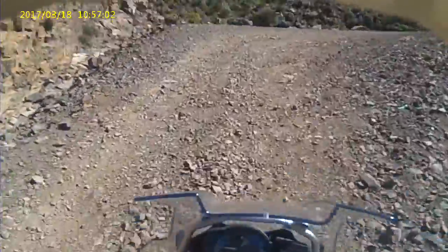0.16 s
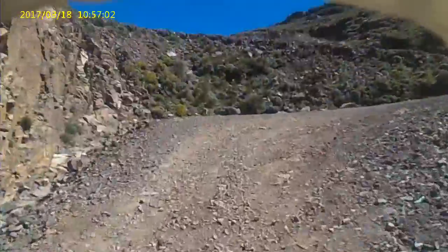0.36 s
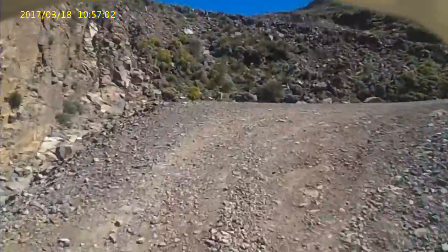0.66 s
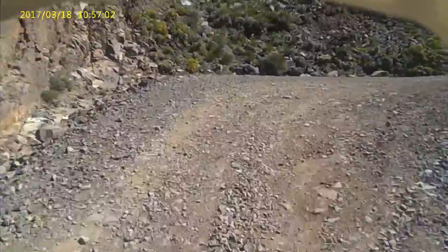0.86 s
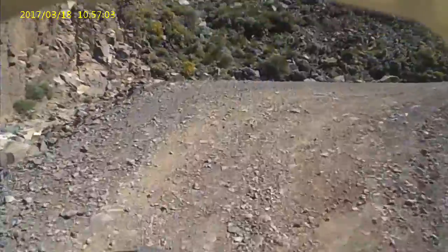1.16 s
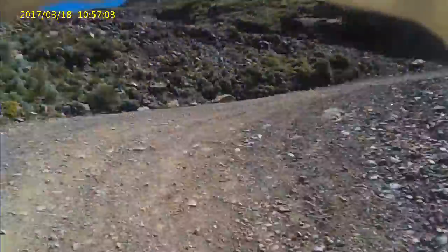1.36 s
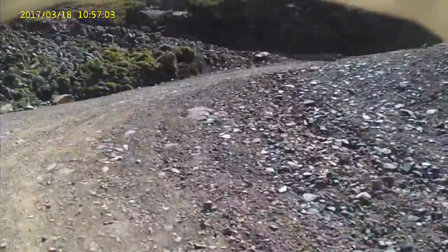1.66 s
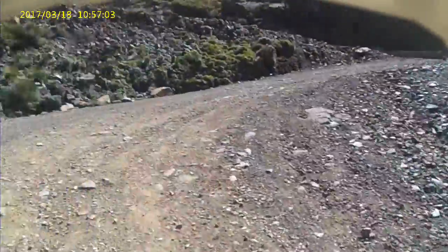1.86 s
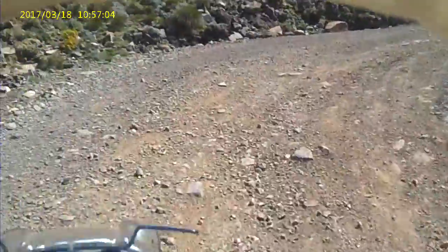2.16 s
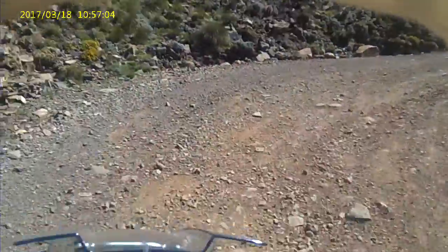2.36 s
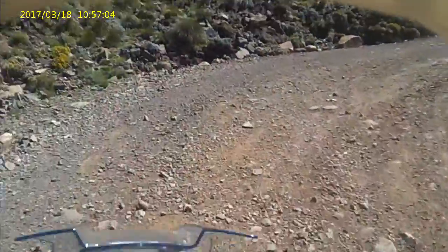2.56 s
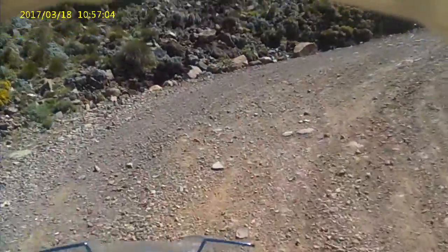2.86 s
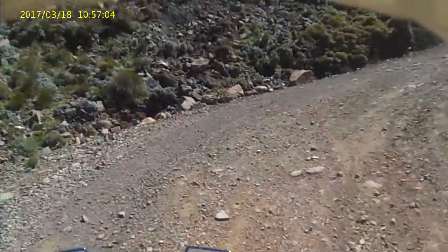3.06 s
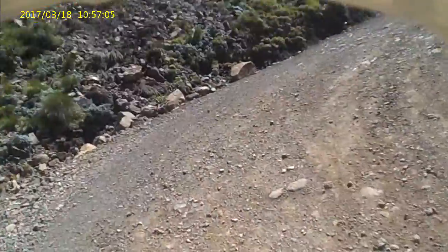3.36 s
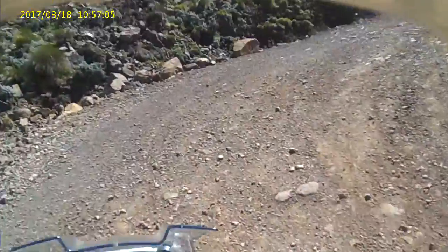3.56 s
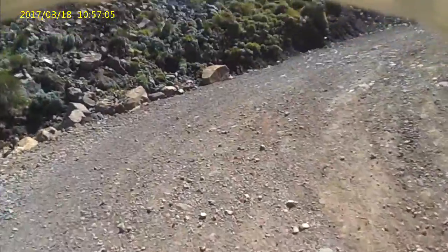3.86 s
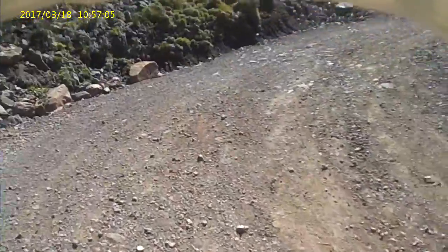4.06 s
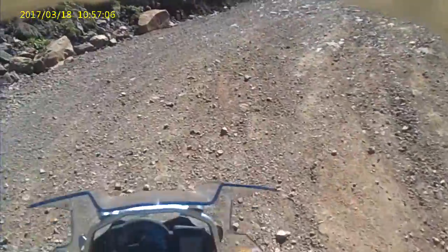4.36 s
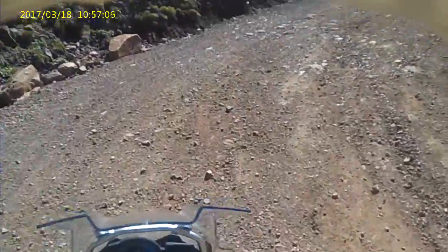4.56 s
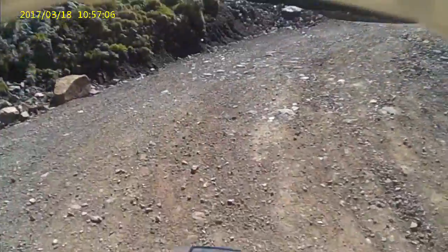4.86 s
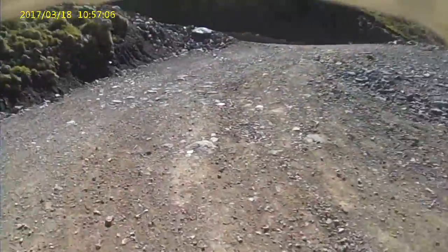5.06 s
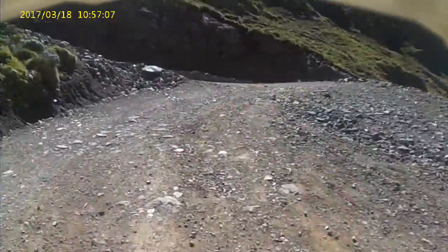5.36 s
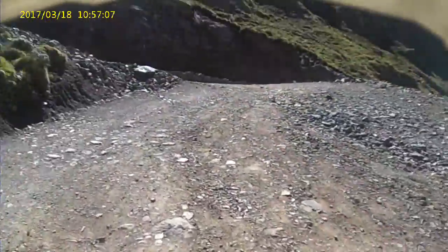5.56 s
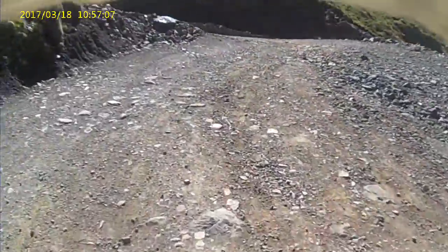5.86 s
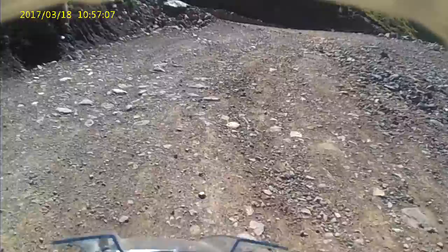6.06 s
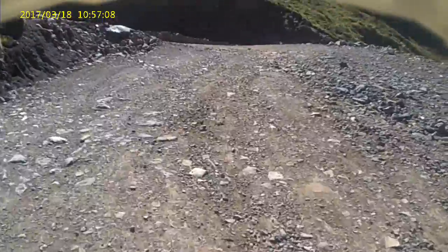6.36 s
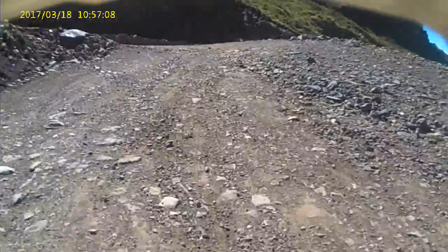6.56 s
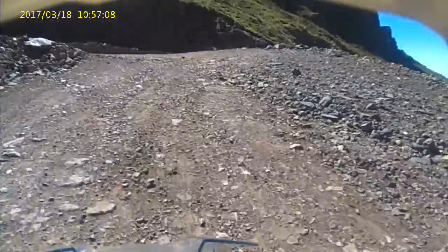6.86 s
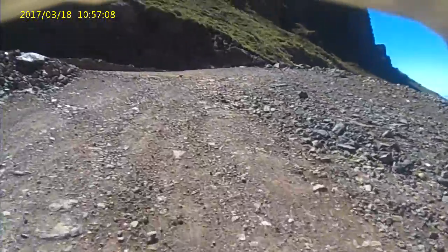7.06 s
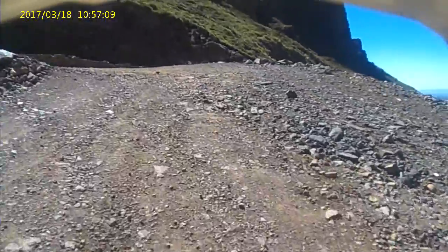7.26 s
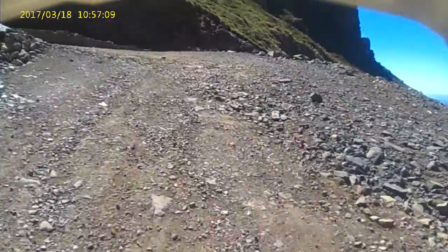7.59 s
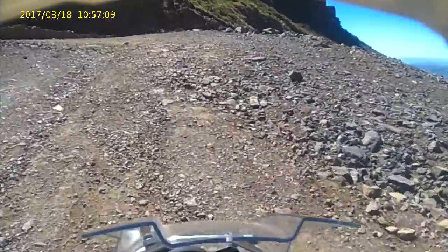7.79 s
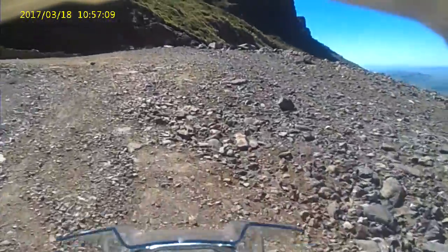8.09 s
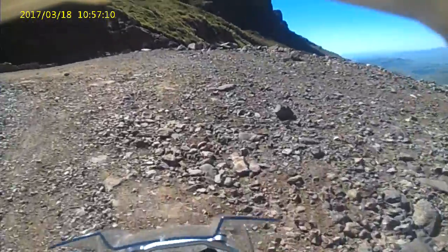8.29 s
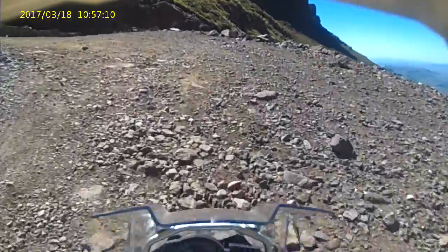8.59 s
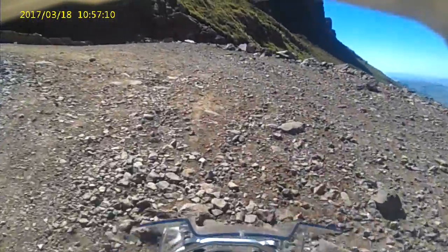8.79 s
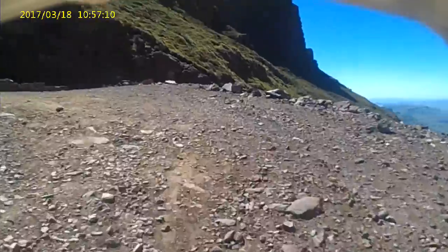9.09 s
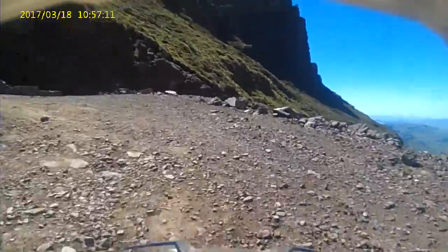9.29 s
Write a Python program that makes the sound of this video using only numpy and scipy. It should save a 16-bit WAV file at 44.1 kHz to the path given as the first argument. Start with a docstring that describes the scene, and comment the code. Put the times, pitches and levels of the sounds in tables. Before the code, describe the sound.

Boxy, muffled motorbike engine clatters and throbs uphill in uneven throttle bursts, with gravel crackle, sharp stone knocks and brief rattles.

```python
"""Loose gravel track: a single-cylinder motorcycle climbs, heard inside a camera case on the rider.
Exhaust: filtered pulse per firing plus gas noise, dropping as the throttle shuts; valve gear clatters on.
Tyres: clumped random cracks; single stones are decaying sines, loose fittings bursts of sparse clicks.
Around them: gear whine, wavering sines that briefly thicken the roar, a two-part hum, buffeting, faint hiss.
The case filter muffles clatter, gravel, gears and rattles and peaks near 1.3 kHz."""
import sys
import numpy as np
from scipy import signal
from scipy.fft import rfft, irfft, next_fast_len
from scipy.io import wavfile
from scipy.ndimage import uniform_filter1d

SR = 44100
rng = np.random.default_rng(int(sys.argv[2]) if len(sys.argv) > 2 else 0)


def store_pcm(level_fs):
    """Save levels as 16-bit WAV."""
    pcm = np.round(np.clip(level_fs, -1, 1) * 32767).astype(np.int16)
    wavfile.write(sys.argv[1], SR, np.atleast_2d(pcm).T)


N = 415863
TIME = np.arange(N) / SR


def gain_of(db):
    """Decibels to amplitude ratio."""
    return 10 ** (np.asarray(db) / 20)


def evened(x):
    """Scale to rms 1."""
    return x / np.sqrt(np.mean(x ** 2) + 1e-20)


def read(points, hz):
    """Spectrum in dB, interpolated on a log-frequency axis."""
    point_hz, point_db = np.transpose(points)
    return np.interp(np.log(hz + 1), np.log(point_hz + 1), point_db)


def along(table, axis):
    """One column of a time curve at every sample."""
    rows = np.asarray(table)
    return np.interp(TIME, rows[:, 0], rows[:, axis])


def add(mix, start_s, sound):
    """Mix a sound in place at start_s."""
    part = mix[max(round(start_s * SR), 0):][:len(sound)]
    part += sound[:len(part)]


def colour(x, db_at, size=8192):
    """Minimum-phase filter with gain db_at(Hz): each click rings after it lands."""
    hz = abs(np.fft.fftfreq(size, 1 / SR))
    log_gain = np.log(gain_of(np.maximum(db_at(hz), -110)))
    taps = np.fft.ifft(np.exp(np.conj(signal.hilbert(log_gain)))).real
    return signal.oaconvolve(x, taps[:size // 2])[:len(x)]


def through_case(x, tilt_db):
    """Case transmission plus narrow resonances; tilt_db per octave brightens or dulls the source."""
    # case transmission: freq_hz, gain_db
    passband = [(30, -39.5), (250, -30), (550, -22), (690, -17), (800, -15.5), (990, -12), (1070, -1),
                (1320, 2), (1490, -2), (1730, -12), (2780, -16.5), (3280, -25), (3560, -35.5), (5000, -48),
                (6200, -74)]
    # case resonances: freq_hz, width_hz, lift_db
    resonances = [(427, 120, 5.5), (1865, 50, 6), (2192, 39, 6.5), (2695, 280, 2.5), (3910, 540, 6.5),
                  (6800, 890, 16.5)]

    def db_at(hz):
        lift_db = sum(db / (1 + (2 * (hz - f) / width) ** 2) for f, width, db in resonances)
        source_db = tilt_db * np.log2(np.clip(hz, 300, 7000) / 1300)
        octaves_above = np.maximum(np.log2((hz + 1) / 7000), 0)
        return read(passband, hz) + lift_db + source_db - 40 * octaves_above
    return colour(x, db_at)


def wander(rate_hz):
    """Low-passed noise of rms 1: random drift up to about rate_hz."""
    size = next_fast_len(N)
    hz = np.fft.rfftfreq(size, 1 / SR)
    spectrum = rfft(rng.standard_normal(size)) / (1 + (hz / rate_hz) ** 4)
    return evened(irfft(spectrum, size)[:N])


def strikes(turns, scatter_db):
    """One click of uneven size each time turns passes a whole number."""
    at = np.flatnonzero(np.diff(np.floor(turns)) > 0)
    clicks = np.zeros(N)
    clicks[at] = gain_of(scatter_db * rng.standard_normal(N)[at])
    return clicks


def fuzzy_tone(cycles, width_hz):
    """Rms-1 tone whose strength and phase waver: noise on both quadratures."""
    in_phase = wander(width_hz) * np.cos(2 * np.pi * cycles)
    quadrature = wander(width_hz) * np.sin(2 * np.pi * cycles)
    return evened(in_phase + quadrature)


def swells(table):
    """Extra level in dB: a Gaussian bump per row."""
    return sum(db * np.exp(-(2 * (TIME - mid_s) / length_s) ** 2) for mid_s, length_s, db in table)


def throttle(open_s=.04, shut_s=0.066, overrun_db=-78.5):
    """Exhaust level in dB: each twist swells, holds and dies away to the overrun floor."""
    # throttle twists: opens_s, shuts_s, exhaust_db
    twists = [(0, 1.412, -56.5), (1.614, 1.99, -73.5), (2.42, 2.6, -61), (2.576, 2.82, -57.5),
              (2.99, 3.276, -59.5), (3.32, 3.5, -62.5), (4.0, 4.235, -65.5), (4.333, 4.43, -59.5),
              (4.57, 5.373, -63.5), (5.453, 6.06, -65.5), (6.06, 6.664, -58.5), (6.703, 7.085, -61),
              (7.163, 7.465, -61), (7.453, 8.152, -56), (8.125, 8.99, -55.5), (9.04, 9.427, -55.5)]
    push = np.full(N, gain_of(overrun_db))
    for opens, shuts, db in twists:
        rise = np.clip((TIME - opens) / open_s, 0, 1)
        decay = np.exp(-np.maximum(TIME - shuts, 0) / shut_s)
        push = np.maximum(push, gain_of(db) * rise * decay)
    return 20 * np.log10(push)


def effort(speed_hz, load_db, base_db, per_doubling_db, per_load_db, cruise_hz=25, pulling_db=-57):
    """Level in dB: base_db at cruise and pulling load, rising with speed and with exhaust level."""
    speed_lift_db = per_doubling_db * np.log2(speed_hz / cruise_hz)
    return base_db + speed_lift_db + per_load_db * (load_db - pulling_db)


def exhaust(turns, speed_hz, load_db, puff_db=-10, puff_s=0.0081, jitter_s=0.00025,
            echo_s=0.0037, echo_db=-2.5):
    """Each firing, a little early or late, sends a pressure pulse and a gas puff down the pipe."""
    # pulse spectrum: freq_hz, relative_db
    pulse = [(15, -31.5), (40, -18.5), (85, -0.5), (115, 4.5), (190, -5.5), (260, -1), (320, -5),
             (390, -15.5), (470, -18), (560, -28.5), (900, -43.5), (2500, -88.5)]
    # gas noise spectrum: freq_hz, relative_db
    gas = [(40, -21.5), (140, -12.5), (180, -0.5), (290, 2), (370, -5.5), (450, -1), (560, -8),
           (750, -11.0), (1100, -24.0), (3000, -72.0)]
    turns = turns + jitter_s * speed_hz * wander(rate_hz=21)
    firings = strikes(turns, scatter_db=-0.5) / np.sqrt(speed_hz)
    blast = colour(firings, lambda hz: read(pulse, hz))
    # second pass along the pipe doubles the thud
    thuds = blast + gain_of(echo_db) * np.interp(TIME - echo_s, TIME, blast, left=0)
    since_firing_s = (turns % 1) / speed_hz
    flow = 0.24 + np.exp(-since_firing_s / puff_s)
    puffs = colour(flow * rng.standard_normal(N), lambda hz: read(gas, hz))
    return (gain_of(puff_db) * evened(puffs) - evened(thuds)) * gain_of(load_db)


def clatter(turns, speed_hz, works_db, rush_db=2.5, ring_s=0.0051, jolt_db=0.9, size=1200):
    """Valves and piston tick at set crank phases, ringing as decaying noise over a throbbing rush."""
    # valve and piston ticks: cycle_phase [0-1], relative_db
    tick_phases = [(.02, -8.5), (0.131, -3), (.35, -8.5), (.57, -1.5), (.66, -5.5), (.75, -5), (.88, -5.5)]
    t = np.arange(size) / SR
    ticks = np.zeros(N)
    for phase, db in tick_phases:
        clicks = strikes(turns - phase, scatter_db=1.0) * gain_of(db) / np.sqrt(speed_hz)
        at = np.flatnonzero(clicks)
        rings = rng.standard_normal((len(at), size)) * np.exp(-t / ring_s)
        for i, ring in zip(at, rings):
            add(ticks, i / SR, clicks[i] * ring)
    rush = rng.standard_normal(N) * gain_of(np.cos(2 * np.pi * (turns - .7)))
    sound = through_case(evened(ticks) + gain_of(rush_db) * evened(rush), tilt_db=-1.5)
    # level flutter, slow drift removed
    jolts = wander(rate_hz=20)
    jolts = evened(jolts - uniform_filter1d(jolts, size=6000))
    return evened(sound) * gain_of(works_db + jolt_db * jolts)


def gears(turns, works_db, level_db=-10, octave_db=-3, order=38):
    """Teeth mesh `order` times a cycle: a rough whine, loudest where it crosses the case ring."""
    mesh = fuzzy_tone(order * turns, width_hz=12)
    octave = gain_of(octave_db) * fuzzy_tone(2 * order * turns, width_hz=11)
    return through_case(mesh + octave, tilt_db=2.5) * gain_of(works_db + level_db)


def roar_thickening(level_db=-1, waver_hz=14, flutter_db=3):
    """Brief tonal thickenings of the engine's roar: faded sines with random pitch and level waver."""
    # thickenings: start_s, length_s, pitch_hz, rms_db (before level_db and fades)
    rows = [(0.132, 0.34, 1398, -45), (0.557, 0.25, 1318, -44), (1.156, 0.33, 1057, -47),
            (5.42, 0.1, 1498, -47), (7.543, 0.3, 1075, -47), (8.173, 0.46, 1304, -43),
            (9.103, 0.3, 1343, -47.5)]
    drift_cycles = waver_hz * np.cumsum(wander(rate_hz=41.2)) / SR
    flutter, out = gain_of(flutter_db * wander(rate_hz=24)), np.zeros(N)
    for start_s, length_s, hz, db in rows:
        at = np.flatnonzero((TIME >= start_s) & (TIME < start_s + length_s))
        sine = np.sin(2 * np.pi * (hz * TIME[at] + drift_cycles[at])) * flutter[at]
        fade = signal.windows.tukey(len(at), .5)
        add(out, start_s, gain_of(db + level_db) * evened(sine) * fade)
    return out


def drone(hum_db, hz=455, width_hz=19, overtone_hz=655, overtone_db=-6):
    """Two resonances hum as the engine shakes them; only the lower one swells."""
    # hum swells: middle_s, length_s, extra_db
    hum_swells = [(.64, .24, 8.5), (1.1, .5, 5.5), (2.15, 0.57, 6), (3.25, .3, 3.5), (3.95, 0.79, 7),
                  (6.3, 0.53, 2.5), (8.42, .25, 9), (8.95, 0.078, 10), (9.15, .16, 7)]
    ring = fuzzy_tone(hz * TIME, width_hz) * gain_of(swells(hum_swells))
    overtone = gain_of(overtone_db) * fuzzy_tone(overtone_hz * TIME, width_hz)
    return (ring + overtone) * gain_of(hum_db)


def gravel(turns, crunch_db, per_s=1800, spread_db=2.0, bite_db=2, clump_hz=16, clump_db=1.6):
    """Stones snap under the tyres in clumps; the rear tyre bites harder with each power stroke."""
    # crack spectrum: freq_hz, relative_db
    stone = [(200, -11.5), (700, -6.0), (1300, -10.5), (1900, -3.5), (2700, 7), (4500, 1.5)]
    sizes = gain_of(spread_db * np.minimum(rng.exponential(1, N), 4)) * rng.choice([-1, 1], N)
    press_db = clump_db * wander(rate_hz=clump_hz) + bite_db * np.cos(2 * np.pi * (turns - .72))
    cracks = sizes * (rng.random(N) < per_s / SR) * gain_of(press_db)
    sound = through_case(colour(cracks, lambda hz: read(stone, hz)), tilt_db=-0.5)
    return evened(sound) * gain_of(crunch_db)


def knocks(level_db=1, crack=0.22, thud_hz=790, light_t60_s=.015, heavy_extra_t60_s=0.014, size=3000):
    """A flung stone cracks and rings the bike; heavy ones push longer and add a hollow lower mode."""
    # stone hits: start_s, peak_db (before level_db), ring_hz, depth [0-1, hollow thud]
    hits = [(0.436, -28, 1290, .6), (.953, -33, 1266, 0.84), (1.3805, -28, 1250, 0.06),
            (2.004, -37, 1320, .25), (2.3711, -31.5, 1150, .5), (2.927, -35.5, 1350, 0.34),
            (3.138, -33, 1270, 0), (3.2804, -34, 1240, 0.3), (3.8457, -35.5, 1210, 0.1),
            (4.022, -42, 1390, 0), (4.388, -33, 1210, 0.23), (4.406, -30, 1350, 0.24),
            (4.8085, -32, 1210, 0.02), (5.295, -34, 1320, 0.45), (5.352, -39, 1150, 0.3),
            (5.940, -38, 1210, 0), (6.1, -28.5, 1230, 0.17), (6.572, -28, 1165, .7), (6.593, -32, 1166, 0),
            (7.163, -34, 1170, 0.4), (7.678, -31, 1090, 0.46), (7.736, -30, 1130, 0.1),
            (8.411, -23.5, 1390, 0.07), (8.9197, -29, 1345, .05), (9.1045, -29, 1330, 0.05),
            (9.129, -27.5, 1350, 0.1), (9.3791, -29.5, 1284, 0)]
    t, out = np.arange(size) / SR, np.zeros(N)
    for start_s, db, hz, depth in hits:
        t60_s = light_t60_s + heavy_extra_t60_s * depth
        contact_s = t60_s / 10
        ring = np.sin(2 * np.pi * hz * t) * (1 - np.exp(-(t / contact_s) ** 2))
        thud = depth * np.sin(2 * np.pi * thud_hz * t) * (1 - np.exp(-2 * t / contact_s)) / 2
        scrape = evened(through_case(rng.standard_normal(size), tilt_db=1.5)) * np.exp(-t / 0.005)
        hit = (ring + thud + crack * (1 - depth) * scrape) * gain_of(-60 * t / t60_s)
        add(out, start_s, gain_of(db + level_db) * hit / abs(hit).max())
    return out


def rattles(level_db=0, per_s=3500, rise_s=.0015, size=6000):
    """A bump sets loose fittings chattering: random clicks in a dying burst."""
    # rattles: start_s, base_db, decay_s, tilt_db [dB/octave]
    bursts = [(1.582, -42, 0.019, 3.5), (2.136, -45.5, 0.025, 0.5), (3.201, -35.5, 0.023, 3),
              (3.217, -36.5, 0.026, -1), (3.444, -35, 0.024, 2.5), (4.384, -43, 0.043, 3.5),
              (5.153, -45, 0.031, 1), (6.088, -40, .02, 0.5), (8.406, -35.5, 0.014, 1),
              (9.125, -38, 0.014, 1)]
    t, out = np.arange(size) / SR, np.zeros(N)
    for start_s, db, decay_s, tilt_db in bursts:
        chatter = rng.choice([-1., 1.], size) * (rng.random(size) < per_s / SR)
        burst = evened(through_case(chatter, tilt_db))
        envelope = np.exp(-(t / decay_s) ** 2) * (1 - np.exp(-t / rise_s))
        add(out, start_s, gain_of(db + level_db) * burst * envelope)
    return out


def rumble(level_db, gust_db=1):
    """Buffeting from track and air: low-frequency noise with a slow random level."""
    # buffeting spectrum: freq_hz, relative_db
    shape = [(10, -14.5), (25, 0), (55, 0), (105, 0.5), (150, -12.5), (180, -2), (230, -18),
             (310, -13.5), (400, -13.0), (900, -37), (3000, -82.0)]
    low = colour(rng.standard_normal(N), lambda hz: read(shape, hz))
    return gain_of(level_db) * evened(low * gain_of(gust_db * wander(rate_hz=7.0)))


def scene(first_turn=.23, shake=0.17):
    """Crank phase times exhaust, clatter, gears and tyre bite; speed, load and ground set levels."""
    # engine speed, flaring where the rear wheel slips: time_s, firings_hz
    speed_curve = [(0.0, 27.19), (0.42, 41.15), (0.5, 35.24), (0.66, 41.23), (0.78, 34.02), (1.16, 39.25),
                   (1.52, 35.61), (1.6, 28.87), (2.54, 21.9), (2.7, 29.17), (3.14, 21.32), (3.21, 31.91),
                   (3.29, 22.67), (4.52, 20.31), (4.59, 15.29), (4.72, 21.32), (6.06, 20.08), (6.13, 26.58),
                   (6.95, 22.8), (7.02, 29.98), (7.11, 22.19), (7.87, 28.66), (7.94, 26.78), (8.43, 37.2),
                   (8.54, 32.38), (8.83, 33.65), (8.93, 39.23), (9.43, 33.78)]
    # loose stones (+), smooth dirt (-): middle_s, length_s, extra_db
    patches = [(1.24, 0.18, 4), (1.61, .09, 4), (1.85, .14, 1.5), (2.05, 0.12, -9.5), (2.16, 0.066, 6.5),
               (2.33, .16, -6), (2.82, 0.18, 2.5), (3.07, 0.12, 1.5), (3.24, .1, 6.5), (3.46, 0.088, 2),
               (3.6, 0.08, 6), (3.88, 0.27, -4.5), (4.13, 0.066, 4.5), (5.16, 0.089, 10), (5.31, 0.16, -9),
               (6.117, 0.29, 5), (6.46, 0.19, 3.5), (7.5, .2, 3.5), (8.965, 0.092, 4)]
    # clatter surges (+), eases (-): middle_s, length_s, extra_db
    surges = [(.28, 0.21, 1), (2.5, 0.13, -2.5), (3.2, 0.41, -2.5), (4.8, 0.13, 1.5), (5.42, 0.28, 2),
              (6.47, .16, 1.5), (7.02, 0.15, 1), (8.48, 0.13, 2), (9.03, 0.12, -0.5), (9.22, 0.12, 3)]
    speed_hz, load_db, ground_db = along(speed_curve, axis=1), throttle(), swells(patches)
    turns = first_turn + np.cumsum(speed_hz) / SR

    works_db = effort(speed_hz, load_db, base_db=-44, per_doubling_db=4.1, per_load_db=0.19)
    works_db = works_db + shake * ground_db + swells(surges)  # rough ground shakes the bike
    hum_db = effort(speed_hz, load_db, base_db=-73, per_doubling_db=8.2, per_load_db=0.027)
    crunch_db = effort(speed_hz, load_db, base_db=-58, per_doubling_db=10, per_load_db=0.21) + ground_db
    rumble_db = effort(speed_hz, load_db, base_db=-66.5, per_doubling_db=0.8, per_load_db=0.15)

    engine = exhaust(turns, speed_hz, load_db) + clatter(turns, speed_hz, works_db) + gears(turns, works_db)
    ringing = drone(hum_db) + roar_thickening()
    crunch = gravel(turns, crunch_db)
    bumps = knocks() + rattles() + rumble(rumble_db)
    return (engine + ringing + crunch + bumps)[None]


def record(dry, hiss_db=-88.5, edge_hz=15720):
    """Add faint shaped-noise hiss, then low-pass at edge_hz."""
    # hiss spectrum: freq_hz, relative_db
    hiss_shape = [(100, -16), (7800, -14), (9500, -1.5), (11500, 2.5), (15000, -1), (15280, 1), (15400, 14),
                  (15520, -2.5), (15700, -11)]
    hiss = evened(colour(rng.standard_normal(N), lambda hz: read(hiss_shape, hz)))
    taps = signal.firwin(511, edge_hz, window=("kaiser", 9), fs=SR)
    return signal.oaconvolve(dry + gain_of(hiss_db) * hiss, taps[None], "same")


dry = scene()
out = record(dry)
store_pcm(out)
```